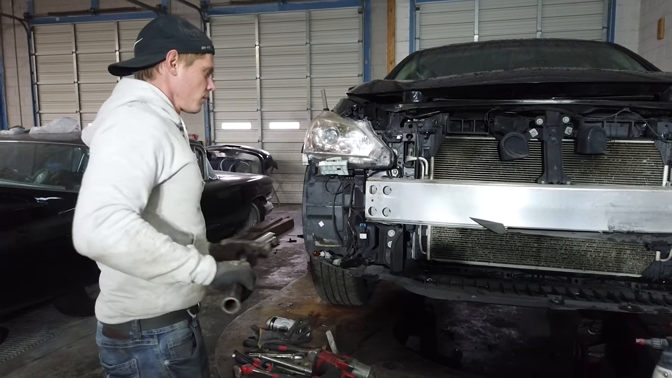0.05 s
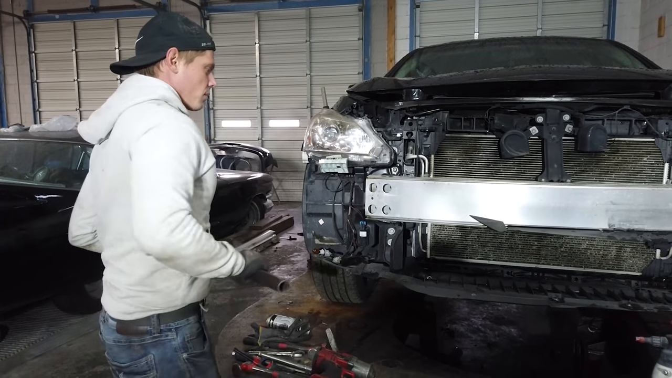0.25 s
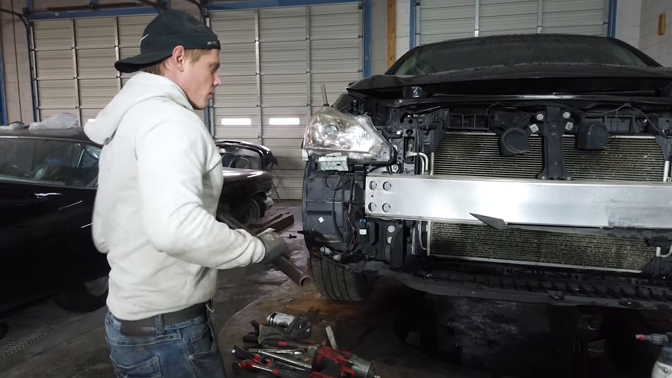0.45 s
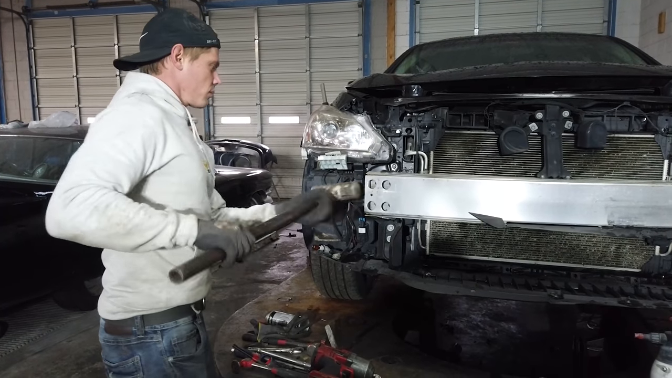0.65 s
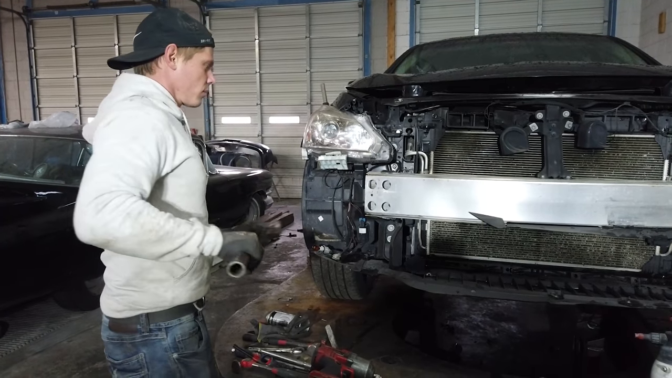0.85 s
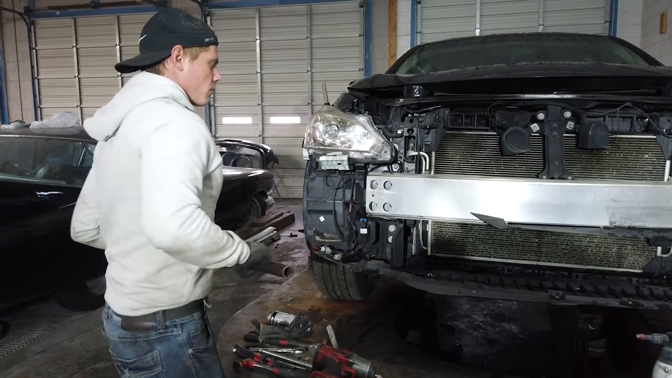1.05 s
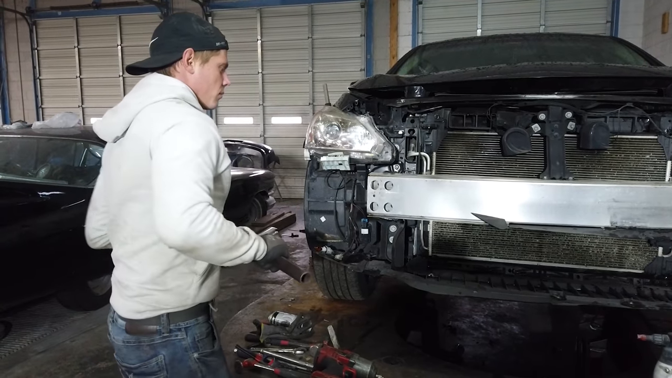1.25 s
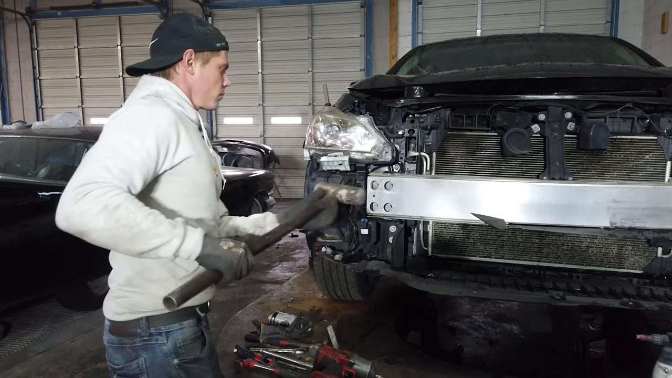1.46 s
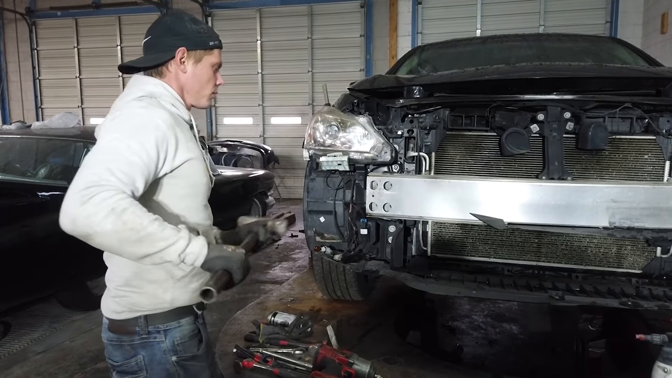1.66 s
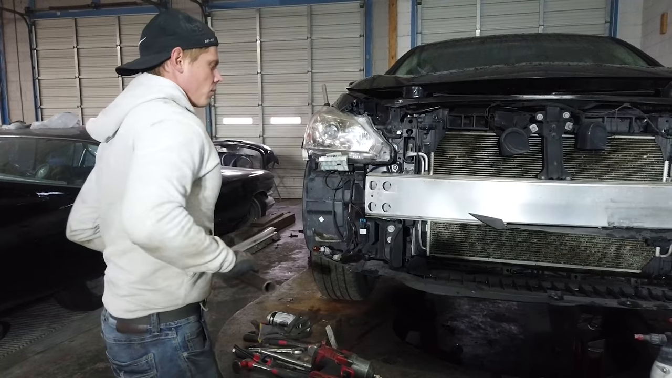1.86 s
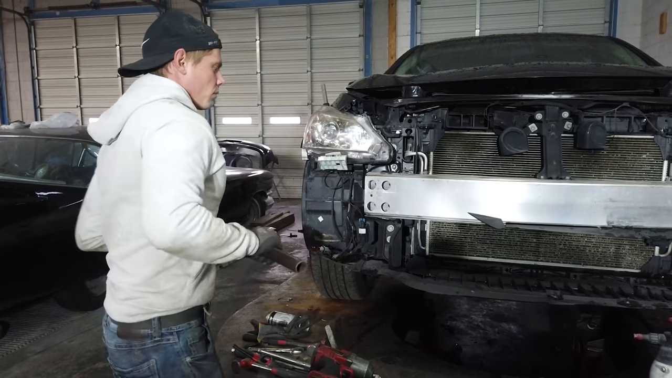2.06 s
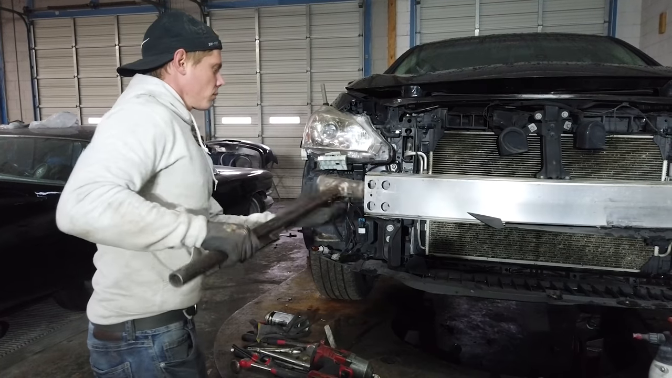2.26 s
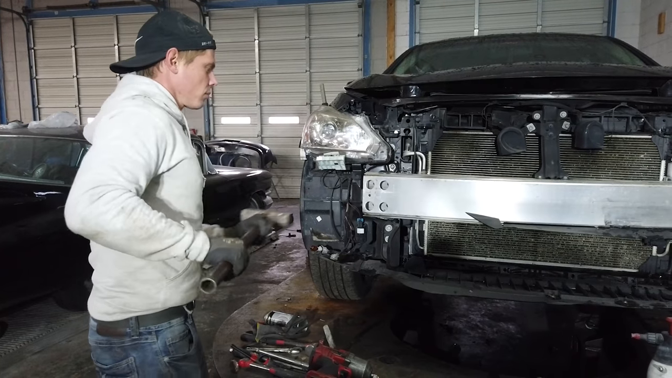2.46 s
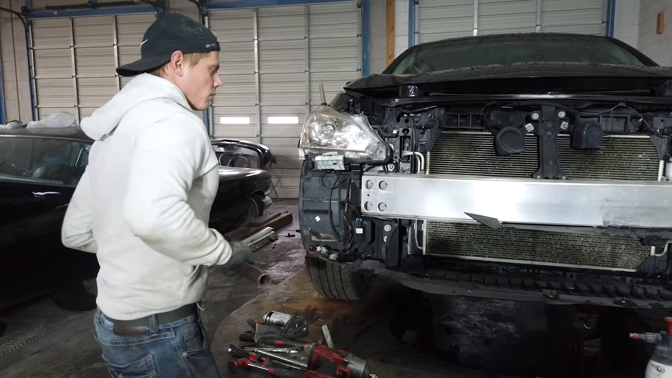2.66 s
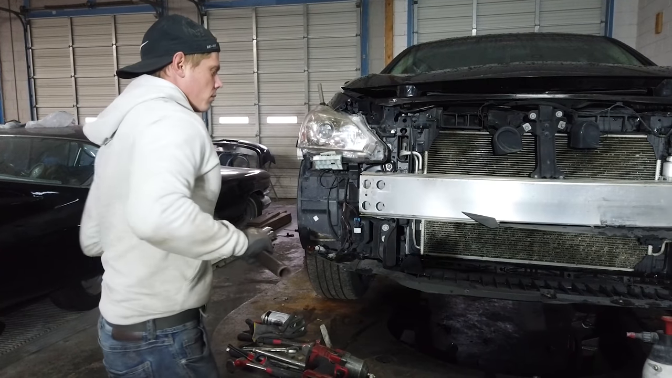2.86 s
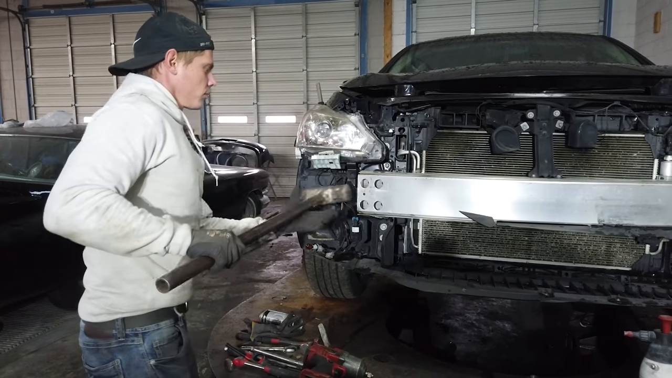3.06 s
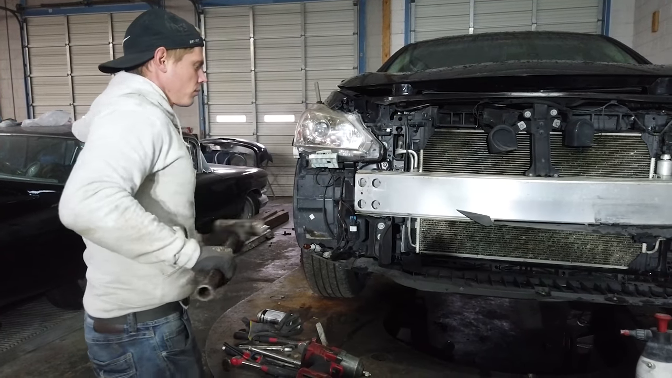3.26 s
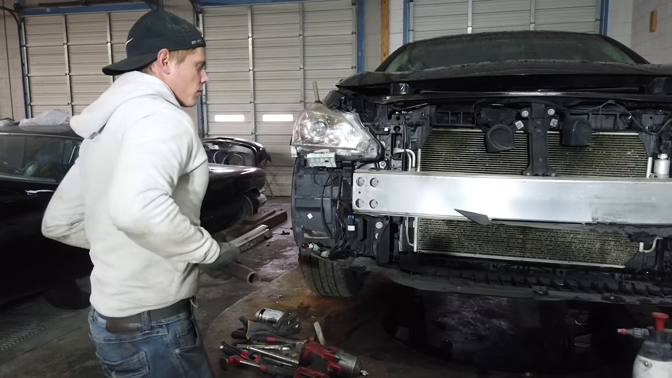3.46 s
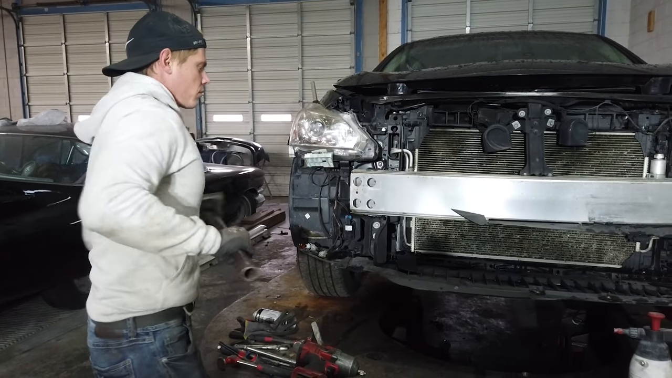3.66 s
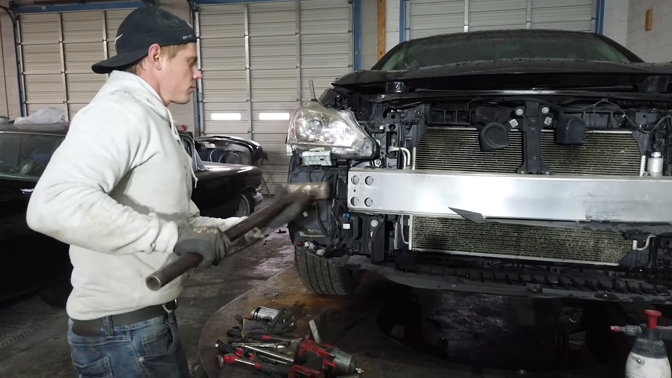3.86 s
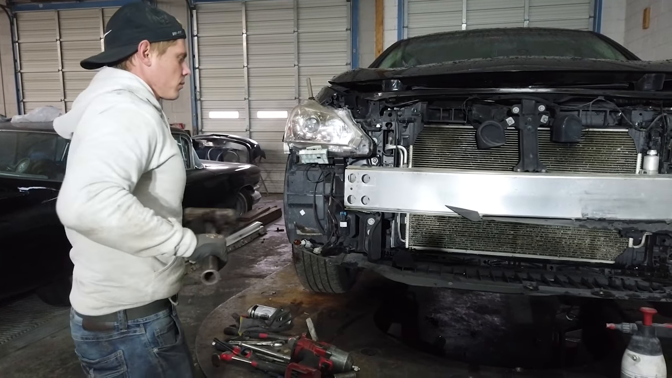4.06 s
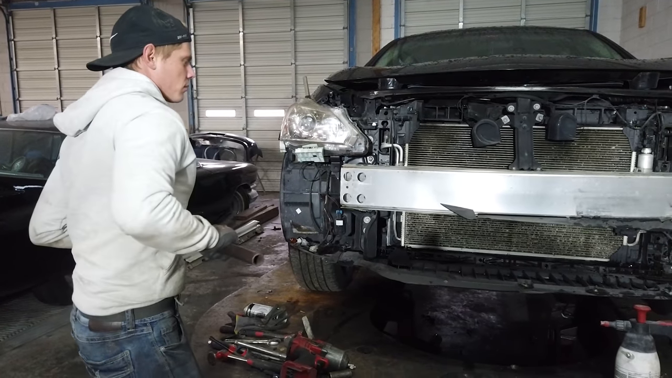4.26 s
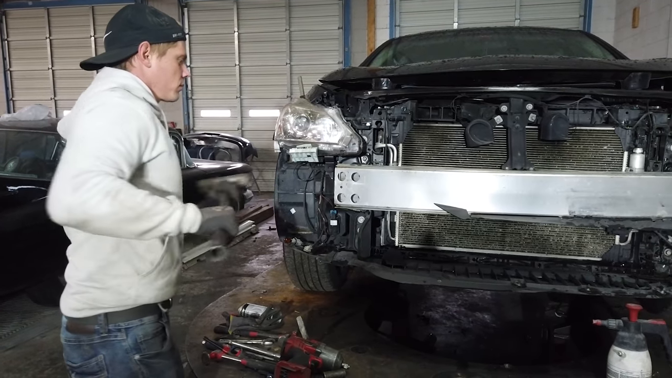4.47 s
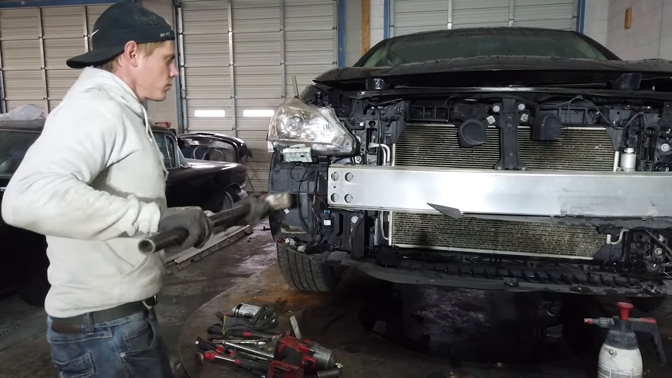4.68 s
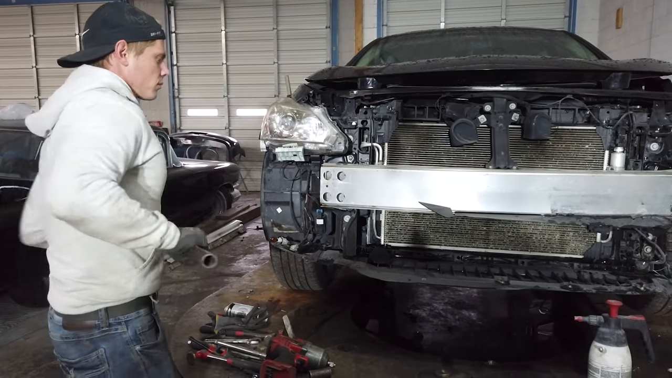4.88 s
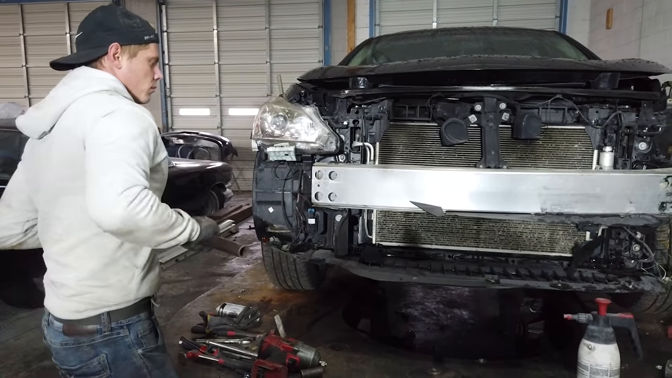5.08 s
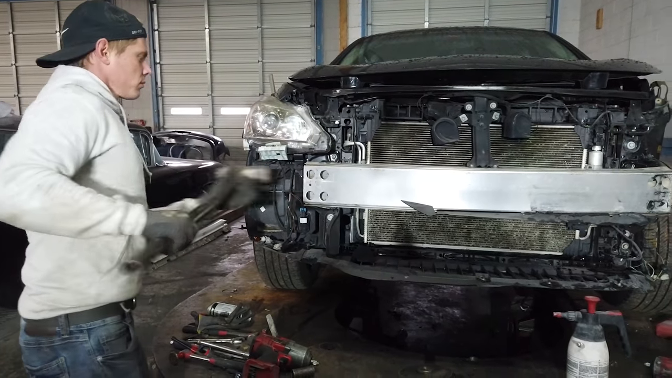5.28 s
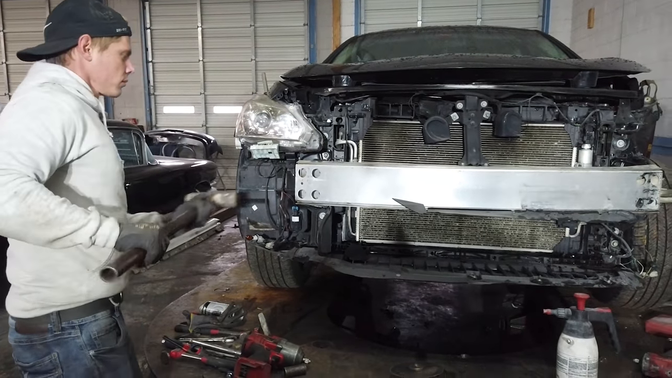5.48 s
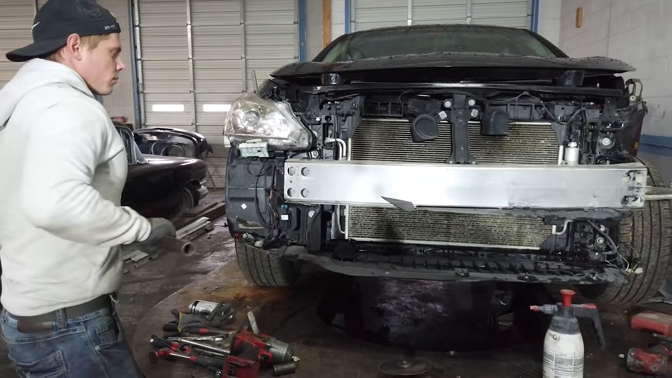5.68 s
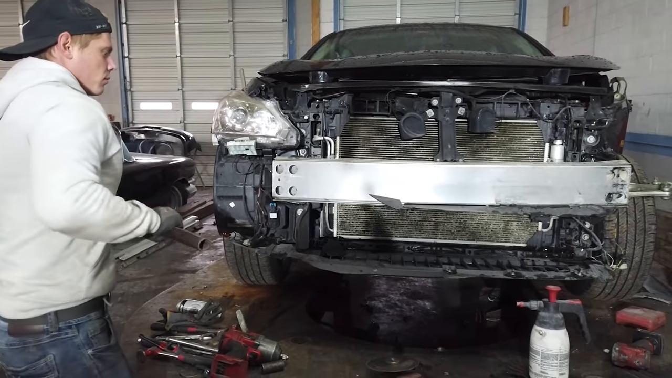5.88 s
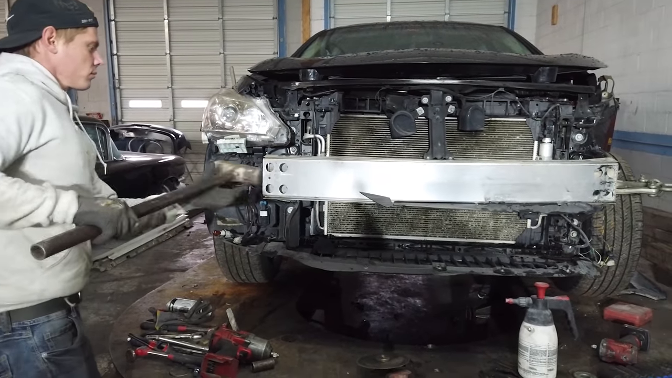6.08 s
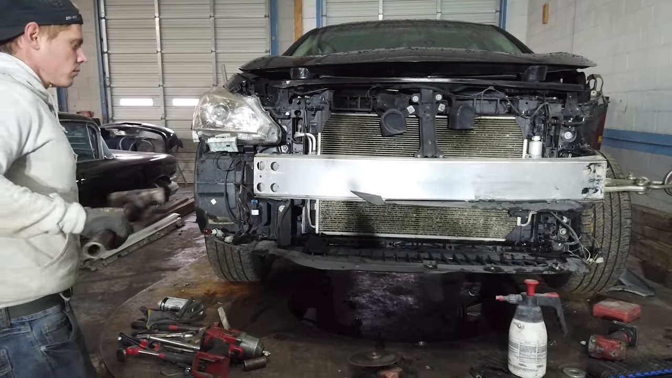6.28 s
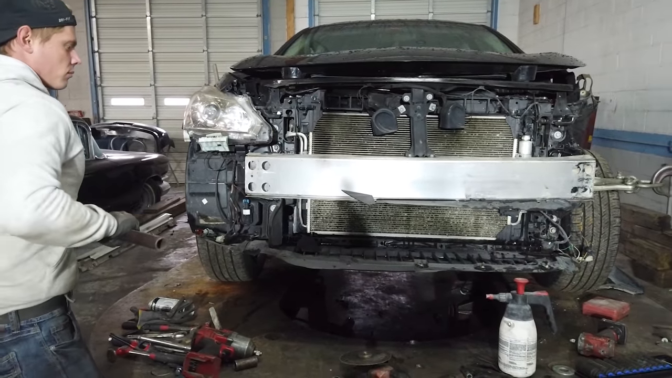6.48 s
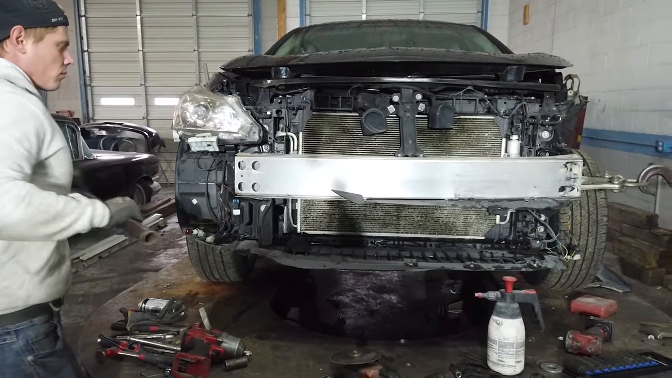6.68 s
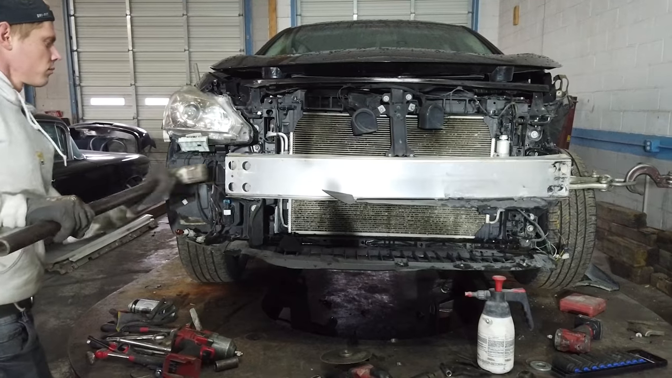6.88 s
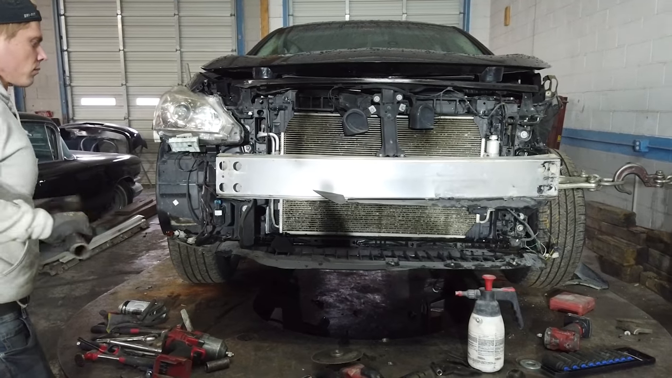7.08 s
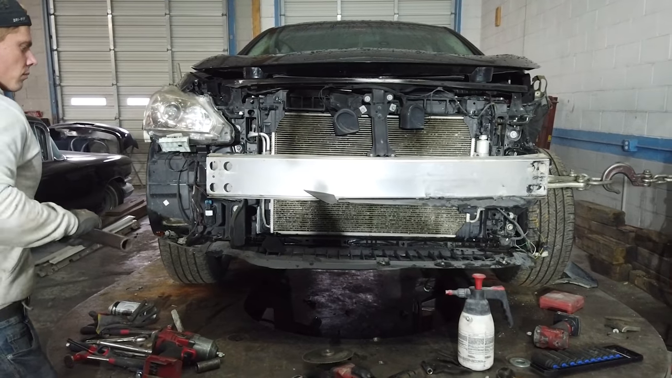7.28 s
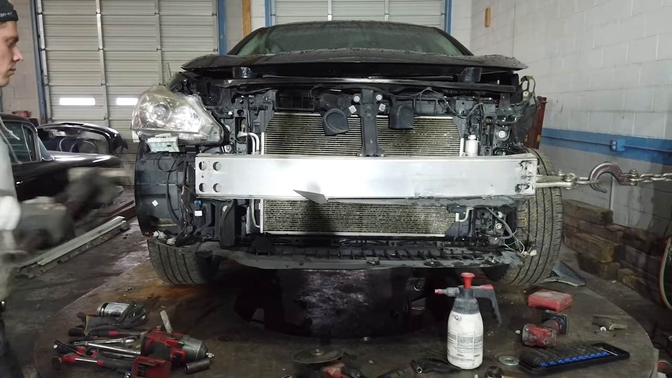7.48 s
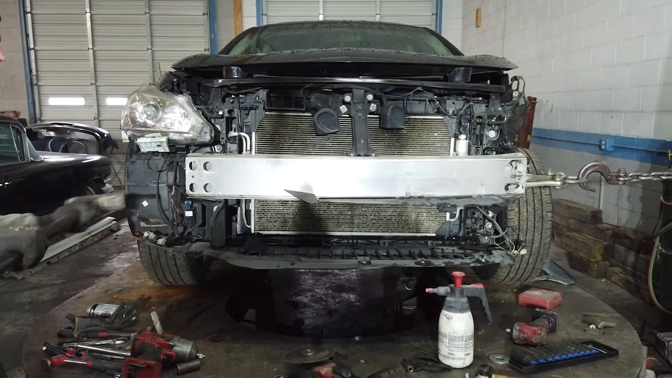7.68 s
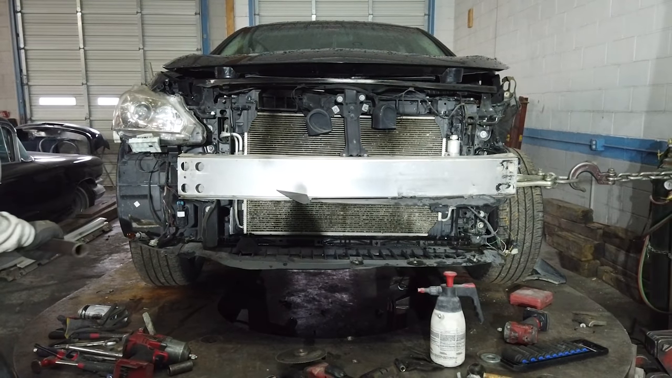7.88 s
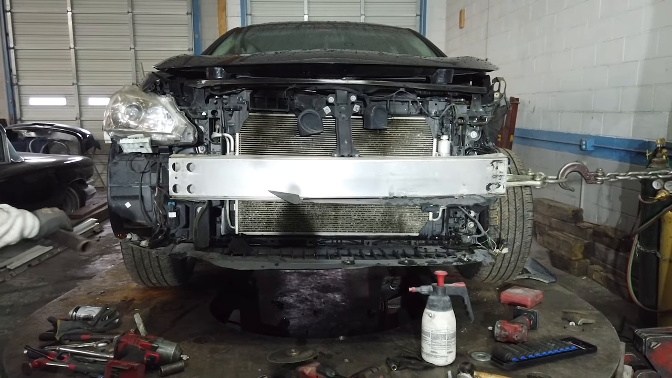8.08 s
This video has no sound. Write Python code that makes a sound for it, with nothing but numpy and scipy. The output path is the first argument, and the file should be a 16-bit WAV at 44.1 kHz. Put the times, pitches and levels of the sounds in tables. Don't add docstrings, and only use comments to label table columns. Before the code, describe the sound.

Ten evenly spaced, overloaded hammer blows on tensioned car metal, with sharp knocks, singing rail and echoing garage reverb above a faint low hum.

```python
import sys
import numpy as np
from scipy import signal
from scipy.fft import rfft, irfft
from scipy.io import wavfile
from scipy.ndimage import uniform_filter1d

SR = 44100
rng = np.random.default_rng(int(sys.argv[2]) if len(sys.argv) > 2 else 0)


def invert_db(x):
    u = np.asarray(x, float) / 20
    return 10 ** u


def file_out(sig):
    cols = np.atleast_2d(sig).T
    lim = np.clip(cols, -1, 1)
    pcm = np.round(lim * 32767).astype(np.int16)
    wavfile.write(sys.argv[1], SR, pcm)


N = 358533
LEAD, EARLY = 4410, 60
GRID_HZ = np.fft.rfftfreq(4096, 1 / SR)
FULL_BLOW_DB = -8.5


def table(rows, hz):
    f, v = np.transpose(rows)
    return np.interp(np.log(np.maximum(hz, 1.)), np.log(f), v)


def fade(t, t60):
    return np.exp(-np.log(1000) * t / t60)


def colour(x, rows, extra_db=0):
    cepstrum = irfft((table(rows, GRID_HZ) + extra_db) * np.log(10) / 20)
    cepstrum[1:2048] *= 2
    cepstrum[2049:] = 0
    impulse_response = irfft(np.exp(rfft(cepstrum)))[:2048]
    return signal.fftconvolve(x, impulse_response)[:len(x)]


def unit(x):
    return x / np.sqrt(np.sum(x ** 2))


def add(track, sound, s):
    i = int(s * SR) + LEAD
    track[..., i:i + sound.shape[-1]] += sound[..., :track.shape[-1] - i]


def dying_noise(size, t60s, rise):
    t = np.maximum(np.arange(size) - EARLY, 0) / SR
    octave = np.log2(np.fft.rfftfreq(size, 1 / SR) + 1)
    spectrum = rfft(rng.standard_normal(size))
    out = 0
    for centre in np.arange(5, 14.6, .5):
        hz = 2 ** centre
        band = irfft(spectrum * np.clip(1 - 2 * abs(octave - centre), 0, 1), size)
        build_up = 1 - np.exp(-t / table(rise, hz))
        out = out + band * fade(t, table(t60s, hz)) * build_up
    return out


def ring(modes, scatter_db, scatter_phase, size=SR // 3):
    t = np.maximum(np.arange(size)[:, None] - EARLY, 0) / SR
    hz, db, t60 = np.transpose(modes)
    luck = rng.standard_normal((3, len(hz)))
    swell = 1 - np.exp(-t * hz / 0.58)
    level = invert_db(db + scatter_db * luck[0])
    phase = 2 * np.pi * hz * (1 + 0.002 * luck[1]) * t + scatter_phase * luck[2]
    return (swell * level * fade(t, t60) * np.sin(phase)).sum(axis=1)


# pitch_hz, density_db_per_hz
SHOP_HUM = [(25, 15.5), (82, -9.5), (140, -5), (162, 17.5), (190, -8), (1430, -1.5), (3000, -22.5),
            (3900, -34.5), (12500, -47), (13000, -66.5)]


def shop_hum():
    return invert_db(-57.0) * np.sqrt(N) * unit(colour(rng.standard_normal(N), SHOP_HUM))


def humps(rows):
    return sum(db * np.exp(-(2 * (GRID_HZ - hz) / width) ** 2) for hz, width, db in rows)


# pitch_hz, width_hz, level_db
FRAME_HUMPS = [(840, 51, -8.5), (1426, 53, -1), (1575, 170, -2.5), (2457, 70, -0.5), (2800, 220, -1),
               (2870, 40, 3), (3100, 370, 1.5), (3190, 92, 2.5), (4670, 89, 0), (5030, 200, -4),
               (6050, 460, -3.5), (6860, 400, 0.5), (7200, 220, -2), (7650, 250, 0)]


def landing(nearest_hz):
    ripple = uniform_filter1d(uniform_filter1d(rng.standard_normal(len(GRID_HZ)), size=9), size=9)
    ripple_db = 1.7 * ripple / ripple.std() * np.clip(GRID_HZ / 1500, 0, 1)
    nearest_width_hz, nearest_db = 150, 4.5
    return humps(FRAME_HUMPS) + humps([(nearest_hz, nearest_width_hz, nearest_db)]) + ripple_db


# pitch_hz, level_db, t60_s
FRAME_MODES = [(159, -24, 0.3), (203, -11.5, 0.058), (289.8, -8, 0.38), (353, -19.5, 0.18),
               (411, -18.5, 0.06), (476, -2, 0.13), (577, -17.5, .12), (715, -9.5, 0.26),
               (782, -14.5, 0.17), (1000, -25.5, 0.11), (1332, 1, 0.1), (1690, -21.5, .15),
               (1934, -4.5, 0.044), (1970, -13, .12), (2027, -15.5, 0.12), (2067, -5.5, 0.14),
              (2160, -7, 0.13), (2360, -6.5, 0.082), (2500, -28.5, .1), (2807, -1, 0.042),
              (3246, -28.5, .08), (3685, -31.5, .1), (4700, -18, 0.11), (4920, -24, 0.12), (6600, -38, .08),
              (6460, -23, .1)]
# pitch_hz, level_db, t60_s
KNOCK_MODES = [(1111, 5, 0.01), (1790, -5.5, 0.017), (3100, -14.5, 0.011), (4740, -19.5, 0.022)]
# pitch_hz, density_db_per_hz
CLANG_SPECTRUM = [(29, -53), (50, -16.5), (128, -8), (213, -1), (345, -4.5), (398, -4.5), (520, -12),
                  (863, -12), (1780, -13.5), (2490, -15.5), (4790, -24), (16000, -46)]
# pitch_hz, t60_s
CLANG_DECAY = [(100, 0.14), (400, 0.071), (1200, 0.032), (4000, 0.043), (12000, 0.03)]


def blow(db, rail_db, bracket_db, spot, landing_db):
    rails = invert_db(-9.0) * ring(FRAME_MODES, 1.0, 2.31)
    near = rails - invert_db(10) * ring(KNOCK_MODES, 1.4, 0.38)
    size = SR // 8
    rise = [(200, 0.039), (600, 0.001), (1500, 0.00012)]  # (Hz, s)
    near[:size] += invert_db(26.5) * unit(colour(dying_noise(size, CLANG_DECAY, rise), CLANG_SPECTRUM))
    near[:EARLY] = invert_db(-31.5) * uniform_filter1d(near[EARLY:2 * EARLY], size=9)
    clang = invert_db(29.5) * unit(colour(signal.unit_impulse(len(rails), EARLY), CLANG_SPECTRUM))
    boom_db = -1.07
    bright_db = 0.48 * bracket_db + 1.2 * (db - FULL_BLOW_DB) + 1.7
    struck = [(230, boom_db), (450, 1.7), (700, 0), (1850, 0.37), (2050, 0.9 * rail_db), (2300, 0.22),
              (4300, 0.48 * bracket_db), (4750, bracket_db), (5500, 0.24 * bracket_db), (12000, bright_db)]
    rows = (near, clang, invert_db(-2.5) * rails)
    return invert_db(db) * np.array([colour(colour(x, struck), spot, landing_db) for x in rows])


# start_s, level_db, rail_db near 2 kHz, bracket_db near 4.7 kHz, nearest_part_hz
BLOWS = [
    (0.727, -8.5, -1.5, 2.5, 7080),
    (1.547, -9, 0, 2.5, 4750),
    (2.352, -10, -1, 2, 2143),
    (3.119, -10, -6, 5.5, 2270),
    (3.886, -9, 6.5, 8.5, 5180),
    (4.652, -9, 6.5, 7, 3160),
    (5.405, -9.5, -3.5, 8, 2377),
    (6.164, -8.5, 7, 5, 3210),
    (6.911, -9, 3.5, 7.5, 6570),
    (7.628, -8.5, -8.5, 7.5, 1100),
]
EARLIER = [
    (-0.07, -12, 0.004, 0.65, 4400),
]
# pitch_hz, level_db
EARLIER_SPOT = [(250, -1.5), (440, 5), (650, 1), (1400, 0.5), (3400, 1), (3600, -0.5), (4200, 6),
                (4400, 10), (4700, 5)]


def hammer_blows():
    track = np.zeros((3, N + LEAD))
    for s, *strength, nearest_hz in EARLIER + BLOWS:
        spot = EARLIER_SPOT if s < 0 else [(1000, 0.0097)]
        add(track, blow(*strength, spot, landing(nearest_hz)), s - EARLY / SR)
    return track


# delay_s, level_db
WALL_ECHOES = [(.0062, -7), (0.0148, -8.5), (0.025, -9), (0.038, -7)]


def echoes(near):
    out = near.copy()
    dull = colour(near, [(4000, -2.5), (12000, -15.5), (14500, -11.5), (15500, -34)])
    for delay, db in WALL_ECHOES:
        add(out, invert_db(db) * dull, delay - LEAD / SR)
    return out


# pitch_hz, t60_s
HALL_DECAY = [(60, 1.05), (150, 0.77), (300, 1.035), (740, 1.256), (1940, 1.18), (4000, 1.005),
              (7000, 0.75), (10000, 0.36), (13500, 0.33)]


def hall(clang, rails):
    turn = np.linspace(0, 3, len(clang))
    sends = (np.cos(turn) * clang - np.sin(turn) * rails, np.sin(turn) * clang + np.cos(turn) * rails)
    rise = [(150, 0.029), (400, 0.012), (1000, 0.0059), (5000, 0.00099)]  # (Hz, s)
    out = 0
    for send in sends:
        tail = unit(dying_noise(SR * 3 // 2, HALL_DECAY, rise))
        tail = colour(tail, [(13500, 0), (14800, -8), (15600, -35)])
        out = out + signal.fftconvolve(send, tail)[:len(send)]
    return out


# pitch_hz, level_db, t60_s
TENSIONED_MODES = [(2018, -32.5, 1.5), (2026, -24, 1.27), (2095, -42.5, 1.2)]


def tensioned_rail():
    out = np.zeros(N + LEAD)
    for s, db, rail_db, _, hz in EARLIER + BLOWS:
        level_db, t60 = table(CLANG_SPECTRUM, hz) - 14, 1.17 * table(HALL_DECAY, hz)
        nearest = [(hz * detune, level_db, t60) for detune in (.985, 1, 1.012)]
        sung = invert_db(1.1 * rail_db) * ring(TENSIONED_MODES, 1.8, 3.0, size=SR)
        sung = sung + ring(nearest, 3.2, 3.0, size=SR)
        add(out, invert_db(db) * sung, s - EARLY / SR)
    return out


# start_s, peak_db, centre_hz
TICKS = [
    (5.155, -27, 1100),
    (5.303, -60, 6000),
    (5.356, -43, 2200),
    (5.367, -60, 7000),
]


def ticks():
    out, t = np.zeros(N + LEAD), np.arange(1500) / SR
    for s, db, hz in TICKS:
        click = rng.standard_normal(1500) * fade(t, .06)
        click = colour(click, [(hz / 3, -14), (hz, 0), (hz * 2, -4), (hz * 5, -26), (hz * 12, -44)])
        add(out, invert_db(db) * click / abs(click).max(), s)
    return out


def scene():
    near, clang, rails = hammer_blows()
    struck = echoes(near) + hall(clang, rails) + tensioned_rail() + ticks()
    return np.tile(struck[LEAD:] + shop_hum(), (2, 1))


def drift():
    track, t = np.zeros(N + LEAD), np.arange(SR) / SR
    hump = (t / 0.061) ** 2 * np.exp(2 - 2 * t / 0.063)
    dip = 1.17 * (1 - np.exp(-t / 0.002)) * np.exp(-t / 0.065)
    for s, db, *_ in EARLIER + BLOWS:
        drift_db = -17 + 6.5 * (db - FULL_BLOW_DB)
        add(track, invert_db(drift_db) * (hump - dip), s)
    return track[LEAD:]


def roll_off(x):
    return signal.sosfilt(signal.butter(12, 16850, fs=SR, output="sos"), x)


def record(dry):
    top, bottom, knee = .55, .7, 4.0
    limit = np.where(dry > 0, top, bottom)
    x = dry / (1 + abs(dry / limit) ** knee) ** (1 / knee)
    x = x + 2.0 * drift()
    x = signal.sosfilt(signal.butter(1, 1.5, "high", fs=SR, output="sos"), x)
    x = signal.sosfilt(signal.butter(1, 9000, fs=SR, output="sos"), x)
    x = signal.sosfilt(signal.ellip(8, .2, 60, 16200, fs=SR, output="sos"), x)
    return roll_off(x)


dry = scene()
out = record(dry)
file_out(out)
```